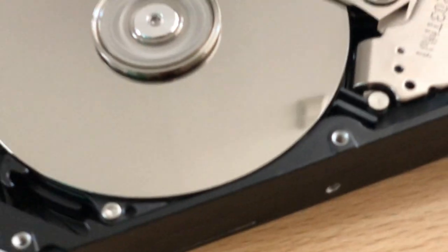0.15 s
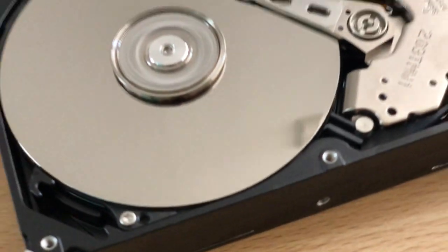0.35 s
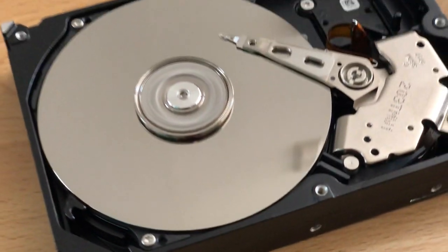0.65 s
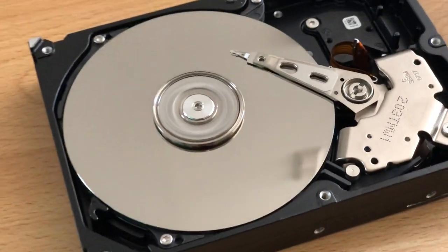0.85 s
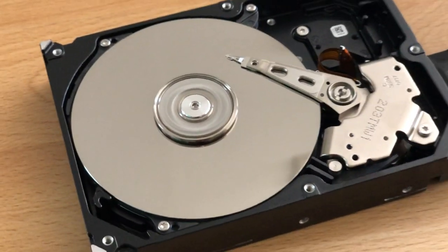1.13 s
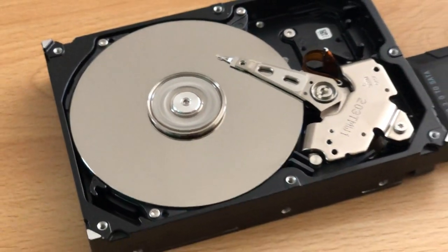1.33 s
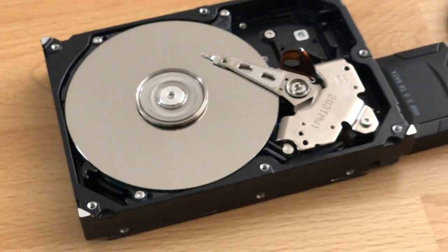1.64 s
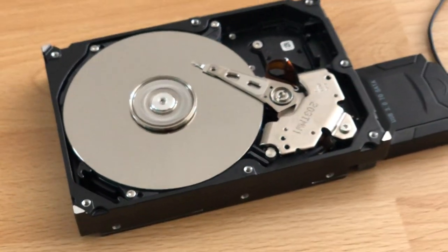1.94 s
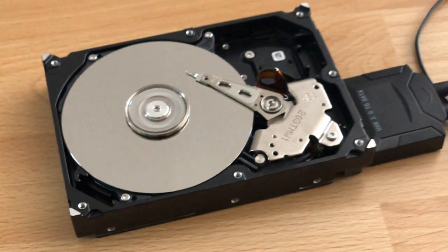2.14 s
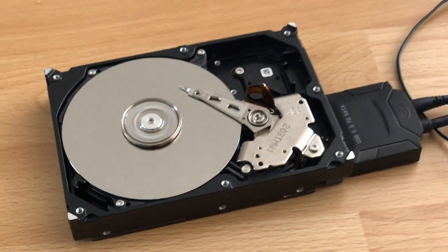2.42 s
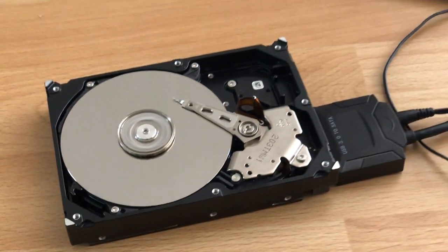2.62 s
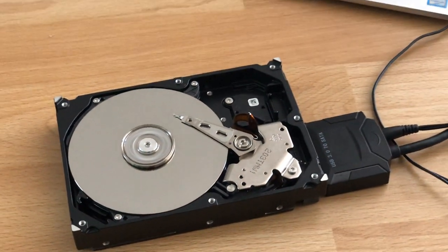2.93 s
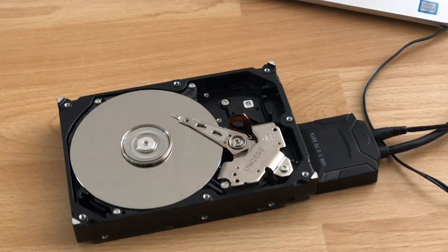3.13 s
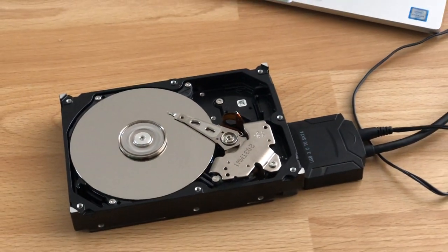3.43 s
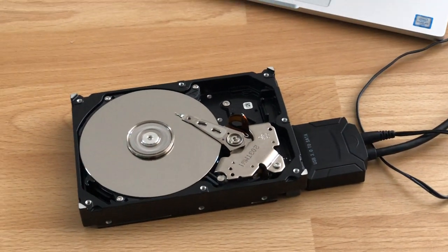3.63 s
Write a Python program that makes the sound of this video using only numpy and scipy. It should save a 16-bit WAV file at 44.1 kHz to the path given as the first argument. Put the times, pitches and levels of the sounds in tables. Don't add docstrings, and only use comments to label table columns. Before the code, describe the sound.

Piercing, stuttering metallic squeal from an open hard drive, chattering rapidly and irregularly over faint hiss and hum

```python
import sys
import numpy as np
from scipy import signal
from scipy.fft import rfft, irfft
from scipy.io import wavfile
from scipy.ndimage import uniform_filter1d

SR = 44100
rng = np.random.default_rng(int(sys.argv[2]) if len(sys.argv) > 2 else 0)


def boost(x):
    u = np.asarray(x, float) / 20
    return 10 ** u


def put_to_file(sound):
    columns = np.atleast_2d(sound).T
    safe = np.clip(columns, -1, 1)
    whole_steps = np.round(safe * 32767)
    wavfile.write(sys.argv[1], SR, whole_steps.astype(np.int16))


N = 166257

# start_s, length_s, chatter_db
SKIPS = [(0.0, 0.0089, -30.5), (0.05, 0.0046, -27), (0.082, 0.013, -29), (0.136, 0.0078, -30),
         (0.171, 0.0085, -27.5), (0.198, 0.011, -29), (0.248, 0.0089, -27.5), (0.282, 0.007, -27.5),
         (0.303, 0.0047, -28), (0.335, 0.0097, -32.0), (0.367, 0.0073, -30.5), (0.38, 0.025, -28),
         (0.403, 0.018, -28), (0.455, 0.017, -41), (0.501, 0.0085, -29), (0.544, 0.0029, -34),
         (0.554, 0.0058, -26.5), (0.584, 0.0073, -31.5), (0.62, 0.0089, -31.0), (0.647, 0.013, -28),
         (0.703, 0.024, -28.5), (0.772, 0.011, -28.5), (0.805, 0.015, -30.5), (0.841, 0.0088, -30.5),
         (0.873, 0.0089, -31.0), (0.892, 0.019, -30.0), (0.937, 0.0092, -32), (0.957, 0.014, -32.0),
         (1.008, 0.01, -36.5), (1.029, 0.0056, -28.5),
         (1.072, 0.008, -29), (1.097, 0.0204, -30.5), (1.141, 0.013, -28.5), (1.186, 0.0095, -29.5),
                (1.201, 0.0132, -31), (1.249, 0.017, -29.5), (1.317, 0.0098, -36.5), (1.36, 0.014, -31.0),
                (1.371, 0.02, -34), (1.396, 0.0098, -38.5), (1.438, 0.0305, -33), (1.487, 0.008, -32.0),
                (1.526, 0.0035, -38.0), (1.553, 0.0106, -31.5), (1.613, 0.0035, -31),
                (1.632, 0.0077, -31.5), (1.654, 0.0035, -35), (1.667, 0.019, -29.0), (1.721, 0.019, -36),
                (1.751, 0.0165, -32.5), (1.789, 0.0068, -36), (1.816, 0.011, -34.5), (1.852, 0.0033, -29),
                (1.867, 0.007, -32.5), (1.878, 0.012, -35), (1.91, 0.011, -32), (1.944, 0.011, -37.5),
                (1.974, 0.0267, -33), (2.034, 0.0052, -33.5), (2.051, 0.01, -34.5),
         (2.067, 0.008, -36.5), (2.082, 0.0056, -36), (2.099, 0.0033, -32), (2.115, 0.0048, -38.0),
               (2.126, 0.02, -33), (2.192, 0.014, -35), (2.21, 0.0035, -34.5), (2.224, 0.0099, -33),
               (2.254, 0.012, -33.5), (2.284, 0.004, -36), (2.301, 0.0069, -37.5), (2.331, 0.024, -34.5),
               (2.382, 0.011, -34), (2.399, 0.0039, -40), (2.411, 0.0057, -36), (2.441, 0.009, -34.0),
               (2.465, 0.003, -51), (2.477, 0.0057, -35), (2.493, 0.013, -37), (2.524, 0.006, -37.0),
               (2.54, 0.0075, -33), (2.555, 0.0059, -35), (2.569, 0.003, -44), (2.588, 0.0046, -34.5),
               (2.624, 0.015, -34.5), (2.659, 0.018, -34.0), (2.692, 0.0084, -34), (2.708, 0.021, -32),
               (2.733, 0.011, -35.5), (2.755, 0.004, -38.0),
         (2.763, 0.018, -34.5), (2.83, 0.016, -34), (2.855, 0.015, -34.5), (2.887, 0.008, -37.0),
              (2.921, 0.0038, -34.5), (2.957, 0.015, -35.5), (2.989, 0.011, -32.5), (3.008, 0.0084, -33),
              (3.027, 0.0079, -32.5), (3.071, 0.012, -36.5), (3.094, 0.0043, -35.5), (3.11, 0.0209, -34.5),
              (3.159, 0.0055, -39), (3.179, 0.015, -31.5), (3.216, 0.012, -34), (3.243, 0.019, -33.5),
              (3.275, 0.014, -34.5), (3.336, 0.006, -36.0), (3.35, 0.02, -33), (3.429, 0.01, -37.0),
              (3.457, 0.0078, -34), (3.493, 0.01, -36), (3.519, 0.016, -32.5), (3.566, 0.016, -33),
              (3.617, 0.012, -36.0), (3.671, 0.0097, -32.5), (3.708, 0.008, -36.5), (3.725, 0.006, -36),
              (3.756, 0.0082, -33.5)]
# start_s, length_s, chatter_db
SLIPS = [
    (0.696, 0.008, -34),
    (0.726, 0.013, -30.5),
    (1.243, 0.007, -36.5),
]
# swollen_db, choked_db
SONG_LEVELS = [(-42, -59), (-18.5, -37), (-20, -36.5), (-22, -30.5), (-18, -31), (-18.5, -40),
               (-17, -33.5), (-22.0, -26), (-17.5, -44), (-20, -29), (-17.5, -35.0), (-33, -46),
               (-52, -51), (-18.5, -41), (-18.5, -46.5), (-20, -25.5), (-25, -46), (-24, -34.5),
               (-26.5, -31), (-25.5, -47), (-22, -60), (-21, -46), (-21, -44), (-25, -29), (-25, -34),
               (-23, -57), (-21, -45), (-24.5, -39), (-20, -23), (-20.5, -47), (-25, -30.5),
               (-24.5, -37.0), (-23.5, -41.5), (-27, -31), (-33.0, -40.5), (-28.5, -49), (-22.5, -40.0),
               (-24.0, -27.5), (-28, -44), (-24, -53), (-21.5, -42), (-26.5, -37.5), (-22, -31),
               (-24.5, -42.0), (-25.0, -32), (-25, -37), (-24.0, -24), (-34, -49), (-24, -47),
               (-28.5, -47), (-22.5, -36.5), (-23.5, -40.5), (-27.0, -24.5), (-24.5, -31), (-44, -31),
               (-25.5, -34.5), (-25, -30), (-24.5, -66), (-23.5, -40.5), (-28.0, -46),
               (-21, -39.0), (-30.0, -36), (-24, -34), (-26, -25.5), (-30.0, -40), (-29.0, -38),
                    (-31.0, -32), (-28.0, -50.5), (-24.5, -52), (-26, -32), (-21, -33.5), (-29.5, -43),
                    (-21.5, -50), (-31, -24.5), (-31, -29), (-28, -28), (-25, -27), (-25, -34.5),
                    (-26.5, -35), (-26, -25.5), (-23.5, -36), (-33, -42), (-27, -29.0), (-23, -49),
                    (-24.5, -38.5), (-27.5, -40), (-22.5, -40.0), (-30.0, -37.5), (-44.5, -37.0),
                    (-30, -33), (-32, -54), (-25.5, -36), (-27, -49), (-25.5, -44), (-26.5, -51),
                    (-27, -54), (-25, -44.5), (-29.5, -36), (-30, -43), (-23, -34), (-32, -30),
                    (-26.5, -46), (-25.5, -36), (-28, -39), (-27.5, -31.0), (-33, -40.5), (-25, -47.5),
                    (-26.5, -36.5), (-33, -41.5), (-25.5, -42), (-23.5, -37.5), (-27.5, -35), (-31, -41.5),
                    (-28, -46.5), (-30, -41.5), (-28, -38.5), (-25, -35), (-26.5, -35), (-30.5, -51)]
# mode_hz, width_hz, level_db
METAL_MODES = [(1952, 79, -17), (2316, 47, -3.5), (2789, 65, -9.5), (3595, 124, -12.5), (4375, 74, -13),
               (4490, 73, -16), (5310, 122, -2), (6190, 96, -6), (8680, 330, -23.5), (10000, 77, -19.5),
               (10496, 90, -13), (13200, 66, -23.5), (14470, 210, -32.5)]
SHINING_MODES = (7, 10)
# frequency_hz, level_db
CHATTER_BODY = [(900, -29), (1500, -11), (2600, -24.5), (5500, 2.5), (6600, -3.5), (7300, -9),
                (11000, -4.5), (15500, -24.5)]
# pitch_hz, level_db
HEAD_WHINE = [(5365, -11), (10520, -18)]
# start_s, length_s, pitch_hz, level_db
SQUEAK = (.459, .011, 3305, -39)
# time_s, nearness_db, top_mode_shine_db
MIC_PATH = [
    (0, 1, -5.5),
    (.8, -1.5, -7.5),
    (2, -3.5, 0),
    (3.77, -5.5, 2.5),
]
# frequency_hz, density_db (per Hz)
DRAGGED_AIR = [(300, -25), (700, -19.5), (1200, -14.5), (1500, -5.5), (1950, -1.5), (2600, -5), (3300, -12),
               (7000, -16.5)]
# time_s, turns_hz, turn_level_db, overtone_level_db
SPINDLE = [
    (0, 84, -66, -64),
    (.4, 83.5, -66, -57),
    (.85, 83, -58, -53),
    (2.1, 81.8, -63, -62),
    (2.7, 81.4, -57, -60),
    (3.77, 81.2, -54, -60),
]
# multiple_of_turns, level_db
HUM_PARTIALS = [(1, .3), (1.25, -10.5), (2, -10.5), (3.23, -16)]
# frequency_hz, density_db (per Hz)
ROOM_TONE = [(25, -31), (60, -6), (100, -7), (200, -4), (300, -12.5), (900, -27.5), (2000, -51)]


def evened(x):
    return x / np.sqrt(np.mean(x ** 2) + 1e-20)


def curve(table, index):
    table = np.array(table, float)
    return np.interp(np.arange(N) / SR, table[:, 0], table[:, index])


def coloured(x, points):
    hz, db = np.transpose(points)
    bins_hz = np.fft.rfftfreq(N, 1 / SR)
    gain = boost(np.interp(np.log(bins_hz + 1), np.log(hz), db))
    return irfft(rfft(x) * gain, N)


def drift(span_s):
    size = max(round(span_s * SR), 1)
    once = uniform_filter1d(rng.standard_normal(N), size)
    return evened(uniform_filter1d(once, size))


def sine(hz):
    return np.sin(2 * np.pi * np.cumsum(hz) / SR)


def resonate(x, hz, width_hz):
    r = np.exp(-np.pi * width_hz / SR)
    poles = [1, -2 * r * np.cos(2 * np.pi * hz / SR), r * r]
    return signal.lfilter([1, 0, -1], poles, x) * np.sqrt((1 - r * r) / 2)


def metal(drive, body_db):
    shine = boost(curve(MIC_PATH, index=2))
    modes = np.zeros(N)
    for k, (hz, width_hz, db) in enumerate(METAL_MODES):
        level = boost(db + 1.5 * drift(0.014))
        facing = shine if k in SHINING_MODES else 1
        modes += (-1) ** k * level * resonate(drive, hz, width_hz) * facing
    scale = np.sqrt(sum(boost(db) ** 2 for _, _, db in METAL_MODES))
    return modes / scale + boost(body_db) * coloured(drive, CHATTER_BODY)


def room():
    return boost(-64.5) * evened(coloured(rng.standard_normal(N), ROOM_TONE))


def spindle():
    turns = 2 * np.pi * np.cumsum(curve(SPINDLE, index=1)) / SR
    levels = {1: boost(curve(SPINDLE, index=2)), 2: boost(curve(SPINDLE, index=3))}
    hum = np.zeros(N)
    for multiple, db in HUM_PARTIALS:
        waver = boost(db + 0.8 * drift(0.12))
        hum += waver * np.sin(multiple * turns) * levels.get(multiple, boost(-58))
    return np.sqrt(2) * hum


def rubbing():
    rub_db, body_db, dull_hz, air_db = -43.5, 2.5, 7400, -40
    uneven_db = 3 * drift(0.0033)
    rub = metal(boost(rub_db + uneven_db) * rng.standard_normal(N), body_db)
    rub = signal.lfilter(*signal.butter(1, dull_hz, fs=SR), rub)
    air_spectrum = DRAGGED_AIR + [(SR / 2, -40)]
    air = boost(air_db) * evened(coloured(rng.standard_normal(N), air_spectrum))
    return (rub + air) * boost(curve(MIC_PATH, index=1))


def echo(x):
    t60_s, size = 0.22, 8000
    t = np.arange(size) / SR
    tail = rng.standard_normal(size) * boost(-60 * t / t60_s) * (t > 0.002)
    return signal.fftconvolve(x, tail / np.linalg.norm(tail))[:N]


def squeak():
    start_s, length_s, hz, db = SQUEAK
    t = np.arange(N) / SR - start_s
    overtones = ((2, -6), (3, 0), (4, -7))  # multiple, level_db
    tone = sum(boost(d) * np.sin(2 * np.pi * k * hz * t) for k, d in overtones)
    fade = np.clip(np.minimum(t, length_s - t) / 0.0015, 0, 1)
    return boost(db) * tone * fade


def skipping(skips):
    trim_s, tail_s, edge_s = 0.0012, 0.00066, 0.00015
    landing_db, landing_s = 2.5, 0.003
    gate = np.zeros(N)
    for start_s, length_s, db in skips:
        first = round((start_s + trim_s / 2) * SR)
        last = min(round((start_s + length_s - trim_s / 2) * SR), N)
        since = np.arange(last - first)
        gate[first:last] = boost(db + landing_db * np.exp(-since / (landing_s * SR)))
    fall = np.exp(-1 / (tail_s * SR))
    gate = np.maximum(gate, signal.lfilter([1 - fall], [1, -fall], gate))
    return uniform_filter1d(gate, max(round(edge_s * SR), 1))


def head_whine(gate):
    build_s, rest_db, swell_db = 0.0025, -48, 3.5
    slow = np.exp(-1 / (build_s * SR))
    built = np.minimum(gate, signal.lfilter([1 - slow], [1, -slow], gate))
    built = built + boost(rest_db + curve(MIC_PATH, index=1))
    built = built * boost(swell_db * drift(0.004))
    whine = np.zeros(N)
    for k, (hz, db) in enumerate(HEAD_WHINE):
        tilt = boost(k * curve(MIC_PATH, index=2))
        whine += boost(db) * sine(hz + 40 * drift(0.00426)) * tilt
    return built * whine


def chatter(gate):
    taps_per_s, spread_db, body_db, lift_db = 9000, 2, -3.5, 1.0
    hits = rng.random(N) < taps_per_s / SR
    force = boost(spread_db * np.minimum(rng.exponential(1, N), 5))
    signs = rng.choice([-1., 1.], N)
    taps = evened(hits * force * signs)
    return metal(boost(lift_db) * gate * taps, body_db) + head_whine(gate)


def song(skips, gate):
    pitch_hz, wander_hz, kick_hz = 2244, 9, 50
    peak_lag_s, linger_s, choke_share = 0.002, 0.01, 0.4
    flutter_db, flutter_s, lift_db = 1.2, 0.005, -0.7
    top = skips[:, 0] + peak_lag_s
    gaps = np.append(np.diff(top), linger_s)
    choked = top + np.minimum(skips[:, 1] + linger_s, choke_share * gaps)
    times = np.ravel([top, choked], "F")
    db = np.interp(np.arange(N) / SR, times, np.ravel(SONG_LEVELS))
    db = db + flutter_db * drift(flutter_s)
    knock = np.minimum(gate / gate.mean() / 4, 1)
    hz = pitch_hz + wander_hz * drift(0.0076) + kick_hz * drift(0.001) * knock
    return np.sqrt(2) * boost(db + lift_db) * sine(hz)


def scene():
    skips = np.array(SKIPS, float)
    gate = skipping(np.vstack([SLIPS, skips]))
    drive = song(skips, gate) + chatter(gate) + squeak()
    mix = drive + boost(-21) * echo(drive) + rubbing() + spindle() + room()
    return mix[None]


def roll_off(x):
    return signal.sosfilt(signal.butter(12, 15710, fs=SR, output="sos"), x)


def record(dry):
    dip_hz, dip_width_hz, low_hz, edge_hz = 2090, 90, 49, 15700
    dipped = signal.lfilter(*signal.iirnotch(dip_hz, dip_hz / dip_width_hz, SR), dry)
    low_cut = signal.butter(2, low_hz, "high", fs=SR, output="sos")
    dipped = signal.sosfilt(low_cut, dipped)
    edge = signal.firwin(401, edge_hz, window=("kaiser", 9), fs=SR)
    mix = signal.oaconvolve(dipped, edge[None], "same")
    return roll_off(mix)


dry = scene()
out = record(dry)
put_to_file(out)
```